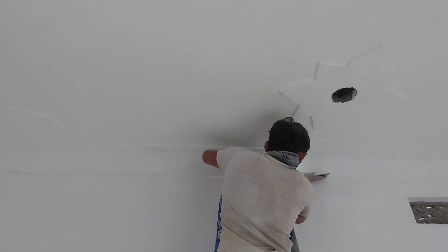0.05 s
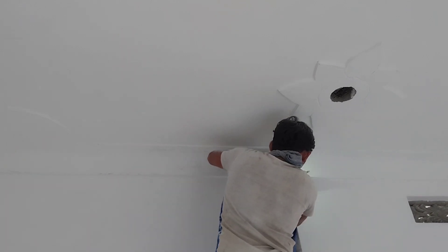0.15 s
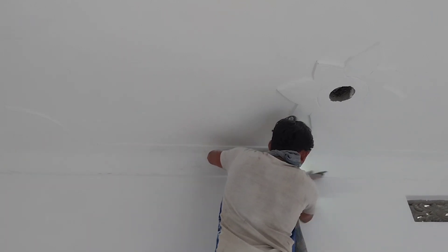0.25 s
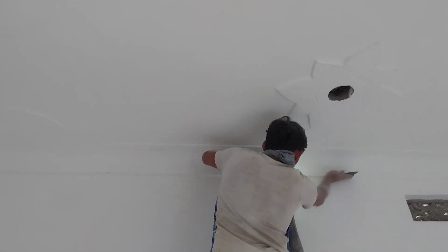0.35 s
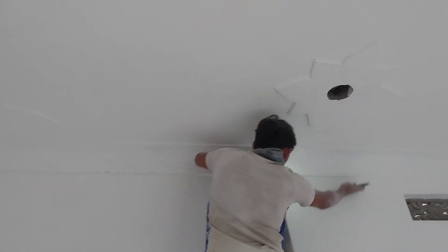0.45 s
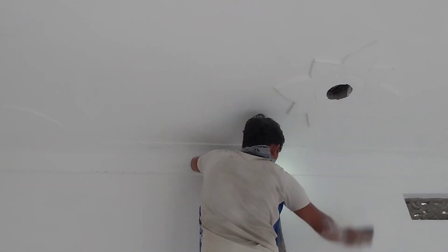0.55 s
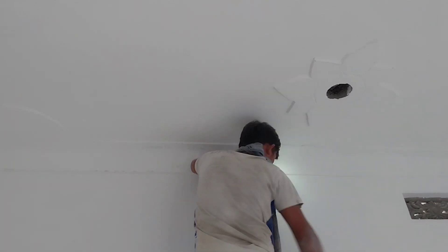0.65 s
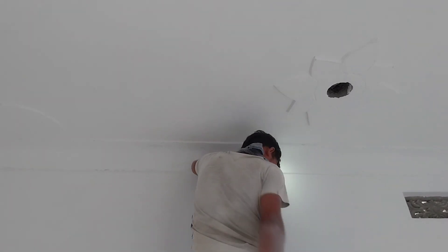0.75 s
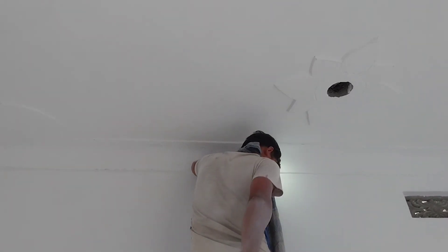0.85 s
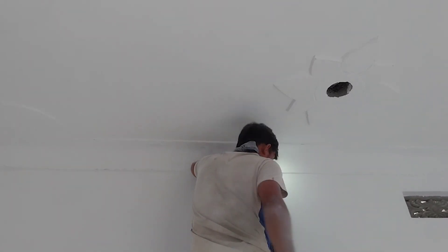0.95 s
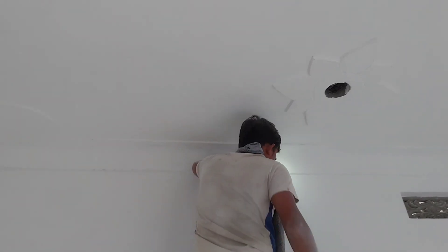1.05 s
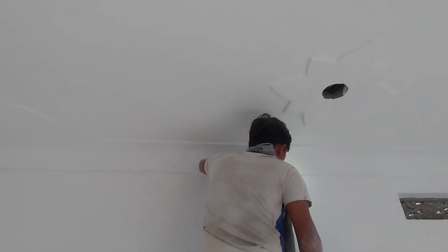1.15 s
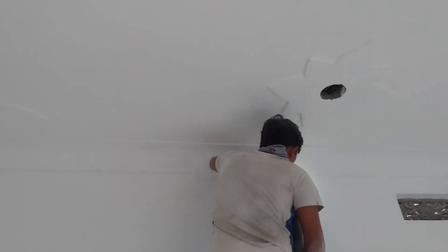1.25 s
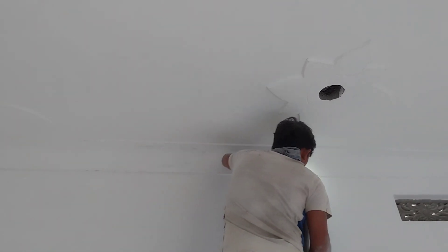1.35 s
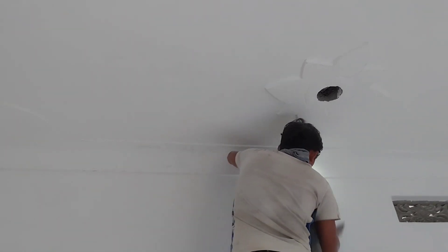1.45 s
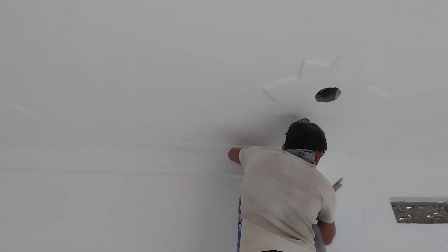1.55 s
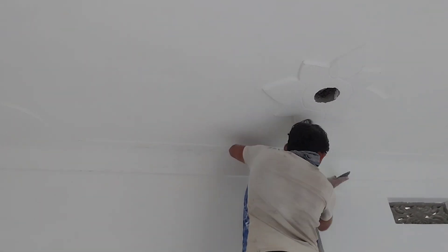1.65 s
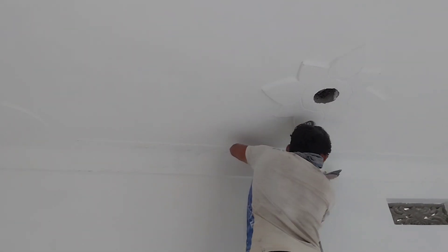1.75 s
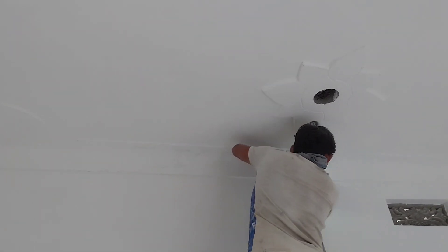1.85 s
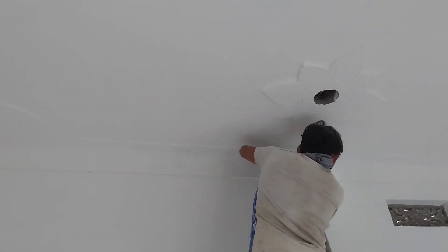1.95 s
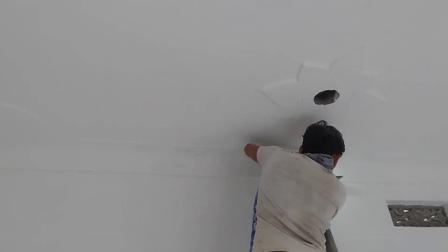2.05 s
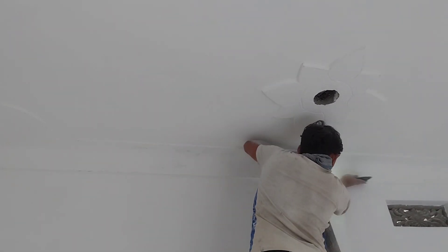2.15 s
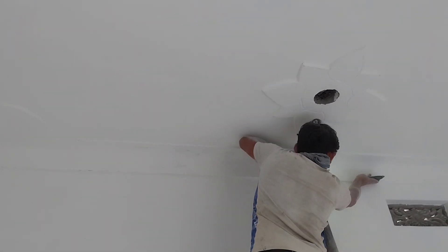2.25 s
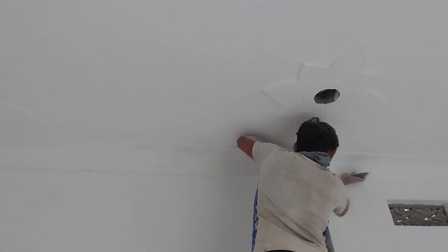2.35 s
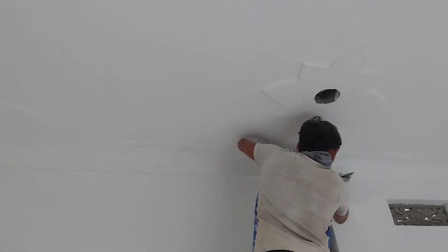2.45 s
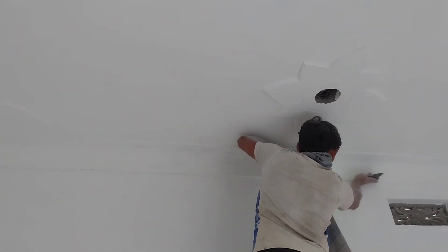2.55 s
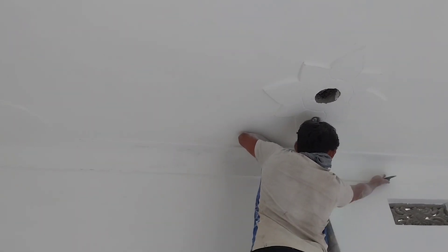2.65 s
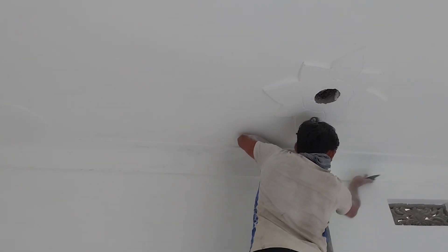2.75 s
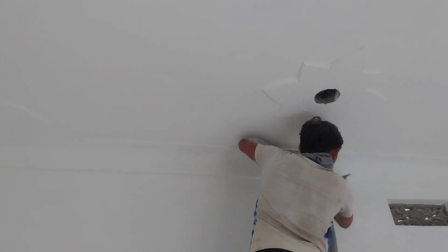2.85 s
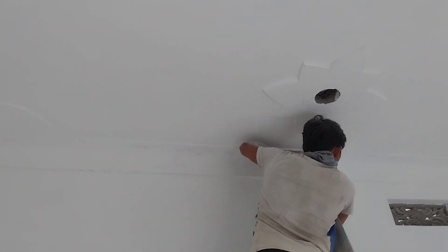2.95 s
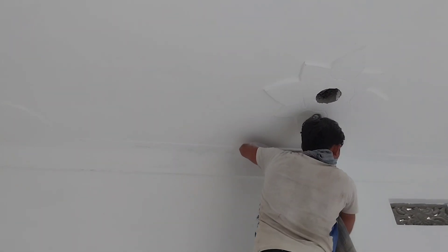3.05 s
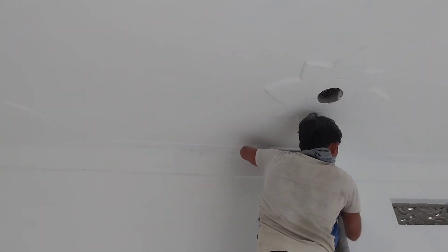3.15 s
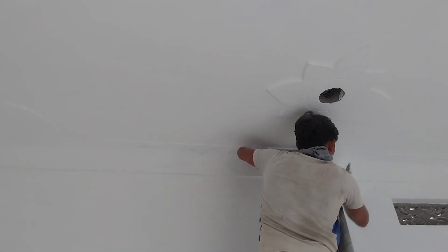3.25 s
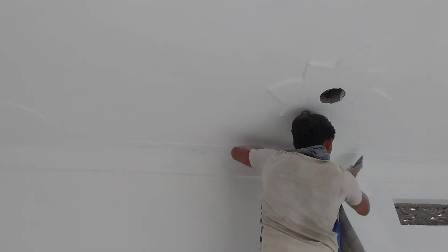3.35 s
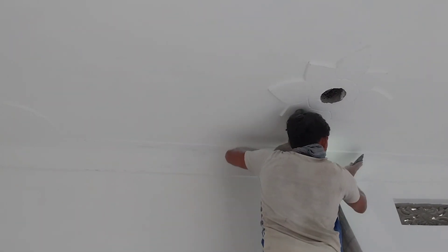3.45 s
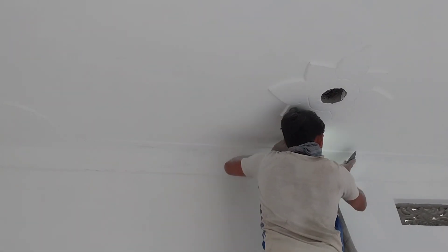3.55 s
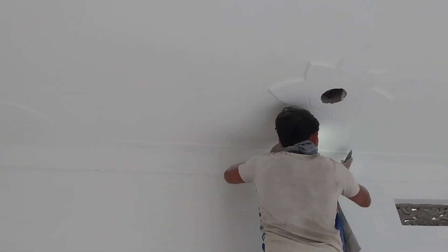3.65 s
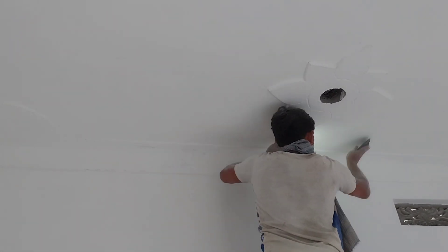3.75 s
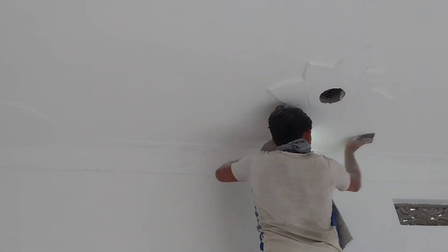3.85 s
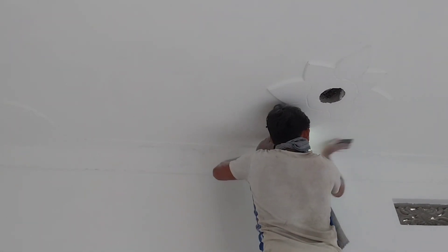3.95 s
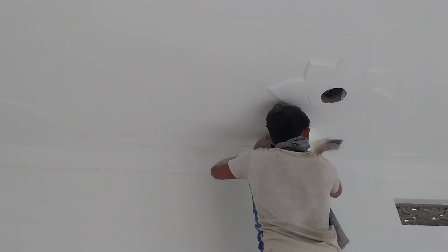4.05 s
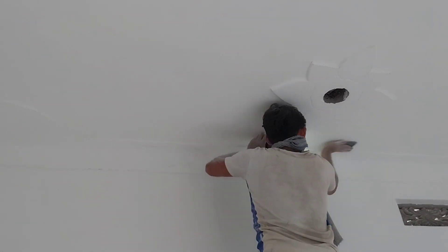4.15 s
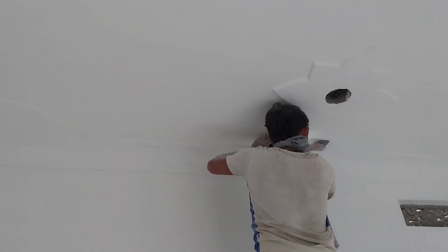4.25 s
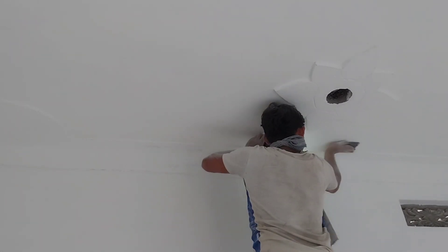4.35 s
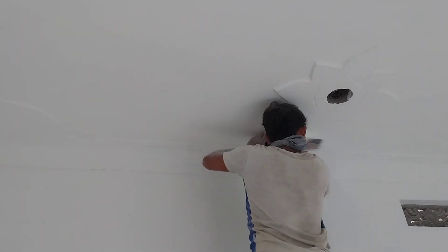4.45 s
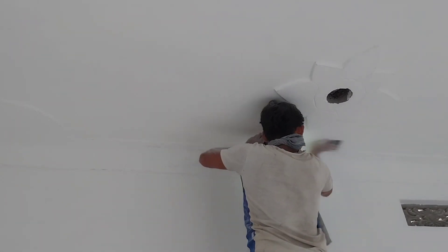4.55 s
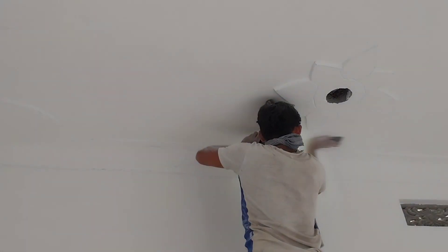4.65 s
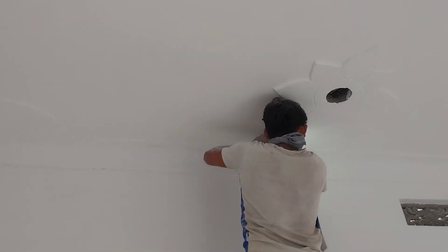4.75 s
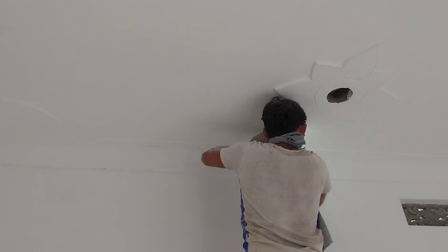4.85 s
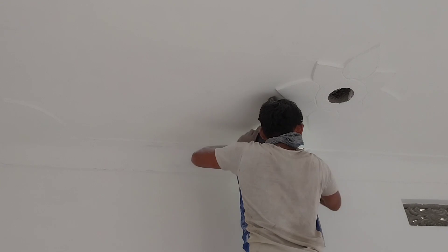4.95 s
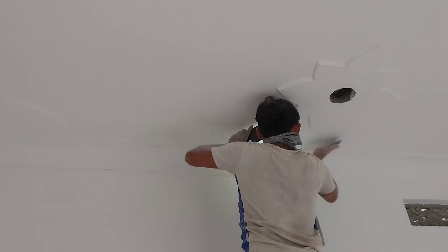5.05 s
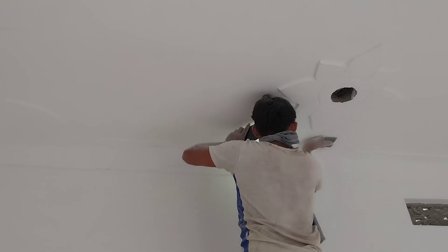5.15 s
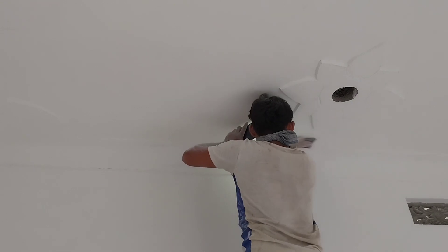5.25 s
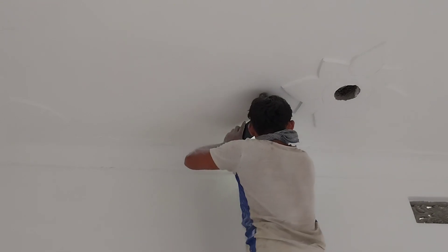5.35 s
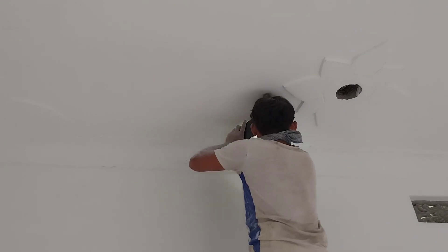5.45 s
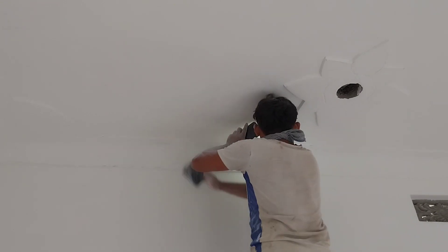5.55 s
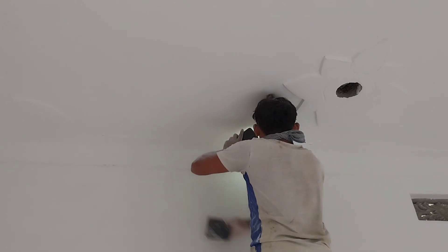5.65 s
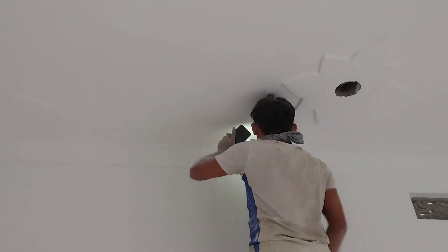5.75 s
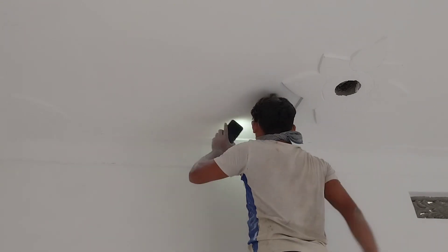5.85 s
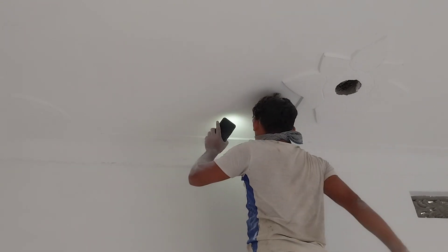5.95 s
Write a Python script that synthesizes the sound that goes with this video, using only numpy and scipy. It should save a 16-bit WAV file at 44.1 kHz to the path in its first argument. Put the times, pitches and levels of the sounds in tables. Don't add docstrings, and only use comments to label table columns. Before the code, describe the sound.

A hand rubs folded sandpaper over dry wall filler in a bare, lively room, heard a few metres away in stereo with the brighter sound leaning right. Rapid scratchy strokes run from the start to about 0.45 s, gritty and hissing with a hollow ring around 2 kHz. A dull low thump comes through the building at 0.55 s, with its roll, while only faint brushes continue. Another thump lands at 1.8 s as rubbing resumes in longer strokes, pairing up around 2.0, 2.3-2.7 and 2.7-3.1 s; a low drone and clear hollow knocks fall near 2.3 s. From 3.1 to 3.8 s it is nearly quiet, with slight brushing. The loudest bout, 3.9-4.9 s, is fast, crisp and drier, about eight strokes a second. After a pause, two overlapping strokes rasp at 5.2-5.6 s with small soft taps, then the room's tail sinks into faint hiss and low rumble.

```python
import sys
import numpy as np
from scipy import signal
from scipy.fft import rfft, irfft, next_fast_len
from scipy.io import wavfile
from scipy.ndimage import uniform_filter1d, map_coordinates

SR = 44100
rng = np.random.default_rng(int(sys.argv[2]) if len(sys.argv) > 2 else 0)


def unload_audio(sound):
    columns = np.transpose(np.atleast_2d(sound))
    steps = np.round(np.clip(columns, -1, 1) * 32767)
    wavfile.write(sys.argv[1], SR, steps.astype(np.int16))


def volts_from_decibels(level):
    exponent = np.asarray(level, float) / 20
    return 10 ** exponent


N = 264159
TIME_S = np.arange(N) / SR
TICK_S = np.arange(-300, 6100) / 1000


def unit(x):
    return x / np.sqrt(np.mean(x ** 2) + 1e-20)


def along(points, hz):
    f, value = np.transpose(points)
    return np.interp(np.log(hz + 1), np.log(f + 1), value)


def wobble(rate):
    knots = rng.standard_normal(int(N * rate / SR) + 4)
    return map_coordinates(knots, [np.arange(N) * rate / SR])


def filtered(x, response):
    size = next_fast_len(x.shape[-1] + 8192, True)
    spectrum = rfft(x, size) * response(np.fft.rfftfreq(size, 1 / SR))
    return irfft(spectrum, size)[..., :x.shape[-1]]


def mode(hz, width):
    return lambda f: 1j * f * width / (hz * hz - f * f + 1j * f * width)


def per_sample(power):
    return np.interp(TIME_S, TICK_S, np.sqrt(power))


# frequency_hz, likeness (0 to 1)
LIKENESS = [(40, .8), (90, .95), (200, .975), (400, 0.93), (700, 0.56), (1200, 0)]


def paired(x):
    def mid_and_side(hz):
        turn = np.arccos(np.clip(along(LIKENESS, hz), 0, 1)) / 2
        return np.array([np.cos(turn), np.sin(turn)])

    mid, side = filtered(x, mid_and_side)
    return np.array([mid + side, mid - side])


# frequency_hz, level_db (per Hz)
HISS = [(240, -38), (400, -9), (634, -10), (1170, -26), (2270, -3), (2730, -1), (3820, 0.5), (7070, -1),
        (8370, -9.5), (12500, -4), (15700, -13)]
# frequency_hz, level_db (per Hz)
BUILDING_RUMBLE = [(20, -32), (45, -6.5), (100, -2), (220, -2.5), (320, -4.5), (420, -23), (700, -40),
                   (1200, -120)]


def hush():
    def noise(spectrum):
        return unit(filtered(rng.standard_normal((2, N)), lambda f: volts_from_decibels(along(spectrum, f))))

    still_db, shake_db, shake_share = -83, -71.5, 0.23
    after_db, after_db_per_s = -27, 14.5
    sheet = effort()[1]
    stir = volts_from_decibels(2 * still_db) + volts_from_decibels(2 * shake_db) * (sheet / sheet.max()) ** shake_share
    for start_s, level_db, *_ in THUMP_EVENTS:
        left_db = level_db + after_db - after_db_per_s * (TICK_S - start_s)
        stir += (TICK_S > start_s) * volts_from_decibels(2 * left_db)
    rumble = per_sample(stir) * volts_from_decibels(1.3 * wobble(29)) * noise(BUILDING_RUMBLE)
    return volts_from_decibels(-64) * noise(HISS) + rumble


def add_blow(track, start, rise, t60, response, gain):
    t = np.arange(SR) / SR
    swell = (1 - np.exp(-t / rise)) * volts_from_decibels(-60 * t / t60)
    noise = unit(filtered(rng.standard_normal((2, SR)), response))
    track[:, round(start * SR):][:, :SR] += gain * swell * noise


# start_s, level_db (rms), length_s, kind
THUMP_EVENTS = [
    (0.541, -33.5, 0.63, "blow"),
    (.6, -45, 0.57, "roll"),
    (1.814, -32.5, 0.64, "blow"),
    (1.899, -48, 0.62, "roll"),
    (2.268, -42.5, 0.42, "drone"),
    (3.814, -71, .7, "roll"),
    (5.279, -67, 0.52, "roll"),
]
THUMP_KINDS = {"blow": (0.029, 1.42, 185, 1.5), "roll": (0.085, 0.7, 210, 0.46),
               "drone": (0.012, 0.49, 314, 0.12)}
# pitch_hz, width_hz, level_db, t60_s (time to fade 60 dB)
SLAB_MODES = [(59.6, 25, -44, .6), (94.7, 5.5, -11, 1.26), (152.2, 10.3, 0.5, 0.98), (205.4, 10.5, -4, 1.1),
              (252, 23, -2, 1.25), (297, 19, 1.5, 0.72), (337.5, 42, 0.5, 0.76), (409, 28, -5.5, 1.1),
              (482, 85, -8, 0.36), (558, 34, -9, 0.68)]


def thumps():
    track = np.zeros((2, N + SR))
    for start_s, level_db, length_s, kind in THUMP_EVENTS:
        rise_s, damping, centre_hz, spread = THUMP_KINDS[kind]
        cut = np.clip((length_s - np.arange(SR) / SR) / 0.063, 0, 1)
        for hz, width, mode_db, t60 in SLAB_MODES:
            share_db = -4 * (np.log2(hz / centre_hz) / spread) ** 2
            gain = cut * volts_from_decibels(level_db + mode_db + share_db)
            add_blow(track, start_s, rise_s, t60 / damping, mode(hz, width), gain)
    return track[:, :N]


# start_s, level_db (rms), pitch_hz, width_hz, t60_s
TAP_EVENTS = [(1.332, -59.5, 665, 216, 0.69), (1.334, -63.5, 1210, 200, 0.98),
              (1.336, -63, 1550, 250, 0.33), (1.34, -66, 807, 70, 1), (1.732, -52.5, 550, 300, 0.94),
              (1.733, -62, 296, 140, 0.61), (2.141, -47, 380, 250, 0.99), (2.3, -38, 1020, 216, 0.72),
              (2.32, -36.5, 662, 300, 0.86), (2.679, -58, 302, 150, .6), (5.09, -66, 594, 356.4, 0.38),
              (5.29, -54, 620, 553, 0.95), (5.535, -50, 644, 240, 0.4), (5.536, -52, 987, 150, 0.25),
              (5.71, -66, 630, 120, 0.45)]


def taps():
    track = np.zeros((2, N + SR))
    for start_s, level_db, hz, width, t60 in TAP_EVENTS:
        add_blow(track, start_s, 0.004, t60, lambda f: mode(hz, width)(f) ** 2, volts_from_decibels(level_db))
    return track[:, :N]


# frequency_hz, t60_s
ROOM_RING = [(300, 0.58), (1000, 0.64), (2200, 0.61), (5000, 0.46), (9000, 0.13), (15000, 0.067)]


def room(x, wet_db):
    hz, t, z = signal.stft(x, SR, nperseg=256)
    keep = volts_from_decibels(-120 * t[1] / along(ROOM_RING, hz))
    power = np.abs(z) ** 2
    for k in range(1, len(t)):
        power[..., k] = keep * power[..., k - 1] + (1 - keep) * power[..., k]
    fresh = signal.stft(rng.standard_normal(x.shape), SR, nperseg=256)[2]
    tail = unit(np.abs(fresh)) * np.exp(1j * np.angle(fresh)) * np.sqrt(power)
    return volts_from_decibels(wet_db) * signal.istft(tail, SR, nperseg=256)[1][:, :N]


def grains(response, scatter_db):
    size = volts_from_decibels(scatter_db * uniform_filter1d(rng.standard_normal(N), size=9))
    return unit(filtered(size * rng.standard_normal((2, N)), response))


# time_s, pitch_hz
SKIN_NOTE = [(0.0, 2020), (0.18, 2140), (0.33, 1810), (0.5, 1900), (0.85, 1970), (1.05, 1930), (1.44, 2393),
             (1.98, 2370), (2.19, 1940), (2.43, 2400), (2.66, 2180), (2.84, 2370), (3.0, 2070), (3.3, 2270)]


def skin(width, shoulder_db):
    note = np.interp(TIME_S, *np.transpose(SKIN_NOTE))
    spacing_hz = 175
    ring = 0
    for hz in np.arange(1800, 2501, spacing_hz):
        share = np.sqrt(np.clip(1 - np.abs(note - hz) / spacing_hz, 0, 1))
        ring = ring + share * grains(lambda f: mode(hz, width)(f) ** 2, scatter_db=-2.0)
    body = grains(lambda f: mode(2200, 1600)(f) ** 2, scatter_db=6.5)
    return volts_from_decibels(0.9 * wobble(24)) * ring + volts_from_decibels(shoulder_db) * body


# start_s, length_s, grit_db, wall_ring_db and drag_db (both above grit)
FULL_STROKES = [(-.14, 0.17, -37, 6, -5.5), (0.018, .2, -32, 1, -12.5), (0.215, 0.18, -29.5, -2, -15.5),
                (0.298, 0.14, -31.5, -5.5, -10.5), (1.805, 0.2, -31.5, -0.5, -17),
                (1.972, 0.33, -32.5, -1.5, -12.5), (2.311, 0.19, -30.5, -3.5, -10),
                (2.46, 0.24, -31, -8, -16.5), (2.711, 0.27, -33, 2, -9.5), (2.854, 0.22, -35.5, 2.5, -7.5),
                (3.905, 0.19, -26, -11.5, -28), (4.076, 0.12, -27, -7.5, -29),
                (4.178, .14, -24.5, -14, -29), (4.305, 0.13, -25, -14, -28),
                (4.416, 0.13, -25.5, -14, -38.5), (4.524, 0.15, -26, -9, -30),
                (4.635, 0.24, -27.5, -12.5, -27.5), (5.178, 0.26, -28.5, -8, -30.5),
                (5.335, 0.26, -27, -11, -26)]
# start_s, length_s, grit_db, wall_ring_db, drag_db
LIGHT_BRUSHES = [(0.603, 0.16, -75, 22.5, 17), (0.672, 0.2, -64, -5, -13), (0.882, 0.071, -63, 9.5, -2),
                 (0.96, 0.23, -67, 1, -3), (1.188, 0.29, -63.5, -1, -25), (1.47, 0.23, -67, 3.5, -5),
                 (3.136, 0.08, -77, -5, 0), (3.41, 0.1, -69.5, 3.5, -18), (3.554, .2, -70, -8, -15.5),
                 (3.796, 0.15, -52, -3, -25), (5.058, 0.12, -72, 17, 11), (5.839, 0.048, -82, 4, -14)]
# start_s, length_s, grit_db, wall_ring_db, drag_db
SUDDEN_LANDINGS = [
    (0.32, 0.1, -44.5, 15, -5.5),
    (1.733, 0.15, -53.5, 6.5, -0.5),
    (2.127, 0.17, -45.5, 12, 7),
    (5.162, 0.09, -43.5, -3, -28),
]
# steepness (power), fade_db_per_s
VOICE_FOLLOW = [
    (1.46, 230),
    (1.035, 153.5),
    (0.46, 120.5),
    (0.25, 104),
]


def effort():
    speed_up_s, slow_down_s, land_s = 0.1, 0.083, 0.004
    sheet_db, sheet_per_ring = 3.5, 0.2
    rows = np.array(FULL_STROKES + LIGHT_BRUSHES + SUDDEN_LANDINGS)
    start, length, grit_db, wall_db, drag_db = rows.T[..., None]
    lands = np.arange(len(rows))[:, None] >= len(rows) - len(SUDDEN_LANDINGS)
    gather = (TICK_S - start) / np.where(lands, land_s, np.minimum(speed_up_s, length / 2))
    lose = (start + length - TICK_S) / np.minimum(slow_down_s, length / 2)
    speed = np.sin(np.pi / 2 * np.clip(np.minimum(gather, lose), 0, 1))
    over_grit_db = [0, sheet_db + sheet_per_ring * wall_db, wall_db, drag_db]
    voices = []
    for rel_db, (steep, fade) in zip(over_grit_db, VOICE_FOLLOW):
        power = np.sum((volts_from_decibels(grit_db + rel_db) * speed ** steep) ** 2, axis=0)
        keep = volts_from_decibels(-2 * fade / 1000)
        voices.append(signal.lfilter([1 - keep], [1, -keep], power))
    return voices


# frequency_hz, level_db (per Hz)
GRIT_COLOUR = [(4350, -39.5), (7400, -2), (8500, -8.5), (9800, -5), (11200, -0.5), (12600, 1),
               (14000, -3.5), (15200, -4.5), (15750, -9)]
# frequency_hz, level_db (per Hz)
SHEET_COLOUR = [(710, -38), (1200, -24), (1320, -14.5), (1910, -8), (2390, -7), (2930, -4.5), (3840, -1),
                (7160, -1), (8500, -14.5), (11000, 17.5), (18700, -120)]
# frequency_hz, level_db (per Hz)
DRAG_COLOUR = [(240, -9), (400, -7.5), (494, -5.5), (653, 0), (1150, 5), (1700, -2), (2210, -16),
               (3740, -120)]


def sanding():
    grit_gain, sheet_gain, wall_gain, drag_gain = [per_sample(power) for power in effort()]
    catch_db = 0.5 * wobble(30) + 0.85 * wobble(150)
    tearing = grains(lambda f: volts_from_decibels(along(GRIT_COLOUR, f)), scatter_db=-8.0)
    grit = grit_gain * volts_from_decibels(-1.3 + 0.76 * catch_db) * tearing
    hiss = grains(lambda f: volts_from_decibels(along(SHEET_COLOUR, f)) / (1 + (f / 8800) ** 16), scatter_db=5.5)
    sheet = sheet_gain * volts_from_decibels(-1.5 + catch_db) * hiss
    wall = wall_gain * volts_from_decibels(-9.0 + 1.6 * wobble(25.55)) * skin(width=280, shoulder_db=0.0)
    rubbing = paired(grains(lambda f: volts_from_decibels(along(DRAG_COLOUR, f)), scatter_db=3.5))
    drag = drag_gain * volts_from_decibels(-5.5 + 1.7 * wobble(17)) * rubbing
    return volts_from_decibels(2.5) * (grit + sheet + wall + drag)


def scene():
    background = paired(thumps() + taps() + hush())
    rub = sanding()
    rub = rub + room(rub, wet_db=-5.5)
    rub = filtered(rub, lambda f: 1 / (1 + (280 / (f + 1)) ** 4))
    return background + rub


# frequency_hz, left_minus_right_db
STEREO_LEAN = [(60, -2), (110, -1.5), (200, 1.3), (380, -3), (700, -2.5), (1290, -5), (2380, -9),
               (4400, -3), (8120, -7.5), (15000, -6.5)]


def microphones(dry):
    top_hz = 15770
    return filtered(dry, lambda f: volts_from_decibels(np.outer([0.5, -0.5], along(STEREO_LEAN, f))) * (f < top_hz))


def roll_off(x):
    return signal.sosfilt(signal.butter(12, 17060, fs=SR, output="sos"), x)


def record(dry):
    ripple_db = -0.9 * np.cos(2 * np.pi * (np.arange(N) - 480) / 1024)
    mix = microphones(dry) * volts_from_decibels(ripple_db)
    return roll_off(mix)


dry = scene()
out = record(dry)
unload_audio(out)
```